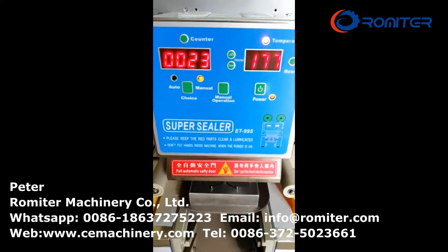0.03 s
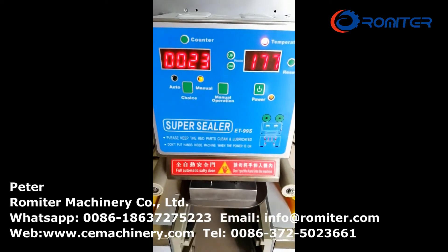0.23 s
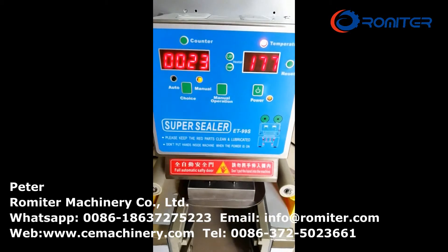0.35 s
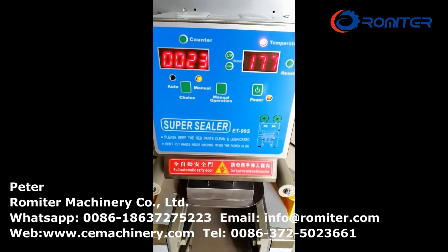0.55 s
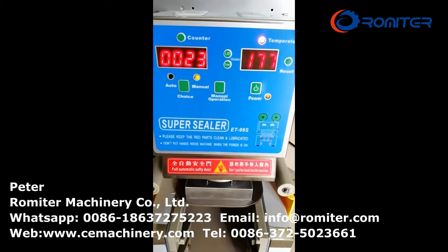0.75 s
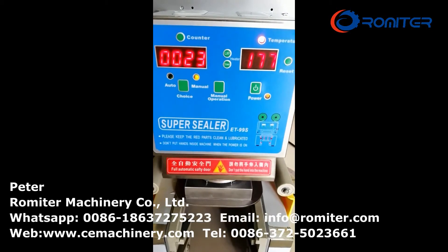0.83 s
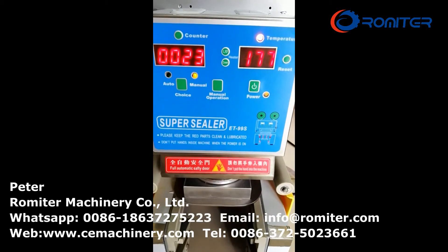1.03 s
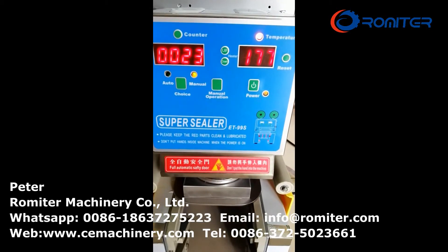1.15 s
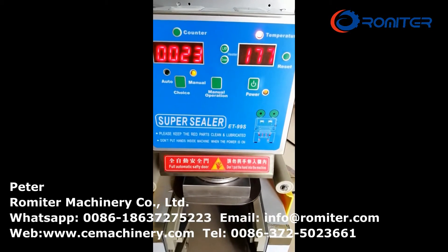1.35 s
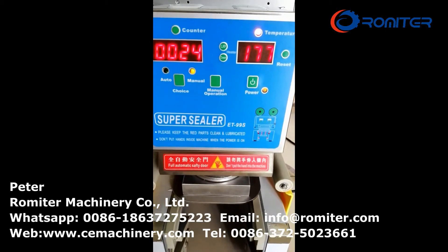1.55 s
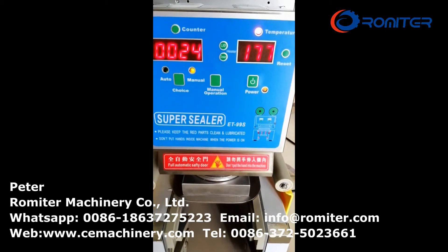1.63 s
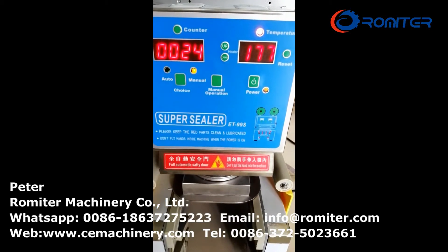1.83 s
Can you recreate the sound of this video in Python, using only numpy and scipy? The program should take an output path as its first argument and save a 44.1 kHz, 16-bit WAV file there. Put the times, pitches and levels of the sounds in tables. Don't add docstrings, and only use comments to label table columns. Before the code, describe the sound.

A small sealing machine cycles close to a phone in a lightly echoing workshop. A thin motor whine stops with bright metal clacks at 0.2 seconds and a solid thud at 0.34. A low press motor hums and grinds, swelling with dull thuds around 0.85-1.1. A latch clicks at 1.37; the motor fades by 1.5, leaving sharp dry clicks, crinkling film and faint hiss until about 1.9.

```python
import sys
import numpy as np
from scipy import signal
from scipy.fft import rfft, irfft
from scipy.io import wavfile
from scipy.ndimage import uniform_filter1d

SR = 44100
rng = np.random.default_rng(int(sys.argv[2]) if len(sys.argv) > 2 else 0)


def attenuation_scalar(level_db):
    decades = np.asarray(level_db, float) / 20
    return 10 ** decades


def bounce(signal):
    frames = np.transpose(np.atleast_2d(signal))
    limited = np.clip(frames, -1, 1)
    pcm = np.round(limited * 32767).astype(np.int16)
    wavfile.write(sys.argv[1], SR, pcm)


N = 83790
T = np.arange(N) / SR


def unit(x):
    return x / np.sqrt(np.mean(x ** 2))


def colour(x, points):
    p = np.array(points)
    f = np.fft.rfftfreq(N, 1 / SR)
    gain_db = np.interp(np.log(f + 1), np.log(p[:, 0]), p[:, 1])
    return irfft(rfft(x) * attenuation_scalar(gain_db), N)


def band(x, hz, width):
    return signal.lfilter(*signal.iirpeak(min(hz, .45 * SR), hz / width, SR), x)


def walk(rate):
    k = int(SR / rate)
    steps = np.repeat(rng.standard_normal(N // k + 1), k)
    smooth = uniform_filter1d(uniform_filter1d(steps, k), k)
    return unit(smooth[:N])


def curve(table, axis=1):
    points = np.array(table)
    return np.interp(T, points[:, 0], points[:, axis])


def grains(share, spread_db):
    size = np.minimum(rng.exponential(size=N), 3)
    return (rng.random(N) < share) * rng.standard_normal(N) * attenuation_scalar(spread_db * size)


def narrow(table, flicker_db):
    total = 0
    for hz, width, db in table:
        level = attenuation_scalar(db + flicker_db * walk(38.05))
        noise = rng.standard_normal(N)
        total = total + level * unit(band(band(noise, hz, width * 1.5), hz, width * 1.5))
    return total


def strike(start, db, hz, rattle, ring_db, modes, octaves):
    t = np.arange(SR // 4) / SR
    push = rng.standard_normal(len(t)) * np.exp(-t / rattle) * np.minimum(t / (0.37 * rattle), 1)
    width = hz * octaves + 90
    for _ in range(3):
        push = band(push, hz, width)
    detune = 1 + 0.0066 * rng.standard_normal((len(modes), 3))
    ring = 0
    for (f, t60), shifts in zip(modes, detune):
        for shift in shifts:
            ring = ring + band(push, f * shift, 4.7 / t60) * np.sqrt(t60)
    y = push / np.abs(push).max() + attenuation_scalar(ring_db) * ring / np.abs(ring).max()
    out = np.zeros(N + len(t))
    i = int(start * SR)
    out[i:i + len(t)] = y * attenuation_scalar(db) / np.abs(y).max()
    return out[:N]


def workshop():
    # (f/Hz, level/dB per Hz)
    room = [(25, 7.5), (40, -6), (70, -6), (235, -14), (620, -37), (1300, -22), (2500, -31), (12000, -26)]
    # (f/Hz, width/Hz, level/dB)
    hiss = [(11500, 3700, -65), (5000, 7300, -69.5)]
    room_db = -64
    shared = rng.standard_normal(N)
    own = [colour(rng.standard_normal(N), [(150, -7), (900, -27), (14000, -6.0)]) for _ in range(2)]
    drift_db = 1.2 * walk(6)
    air = unit(np.array([colour(shared + s, room) for s in own]))
    return attenuation_scalar(room_db + drift_db) * air + np.array([narrow(hiss, 0.51), narrow(hiss, 0.57)])


def reverb(x, t60, db):
    t = np.arange(SR // 2) / SR
    tails = rng.standard_normal((2, len(t))) * np.exp(-np.log(1000) * t / t60) * (t > .003)
    tails /= np.sqrt(np.sum(tails ** 2, axis=1, keepdims=True))
    return attenuation_scalar(db) * np.array([signal.fftconvolve(x, h)[:N] for h in tails])


def film():
    # (t/s, level/dB)
    crinkle_level = [(.95, -62), (1.03, -58.5), (1.35, -64.5), (1.42, -51.5), (1.53, -55), (1.58, -56.5),
                     (1.61, -58.5), (1.64, -51.5), (1.68, -59.5), (1.77, -58.5), (1.79, -69), (1.9, -63.5)]
    # (f/Hz, level/dB per Hz)
    foil = [(3000, -20.5), (5000, -12.5), (6600, -16), (8500, -8), (11500, -5), (13500, -9), (14500, -7.5)]
    crinkle = unit(colour(grains(0.074, 1.3), foil)) * attenuation_scalar(2.35 * walk(58.27))
    fade_in = np.clip((T - .95) / 0.011, 0, 1)
    return crinkle * attenuation_scalar(curve(crinkle_level)) * fade_in


def latches():
    # (t/s, peak level/dB, centre f/Hz, rattle/s)
    clicks = [(.193, -44.5, 2140, 0.042), (0.202, -25, 5160, 0.0028), (0.2003, -32, 9900, 0.0041),
              (.2065, -29, 3670, 0.0015), (.219, -38, 13000, 0.0064), (0.2238, -24, 12200, 0.0018),
              (0.2284, -28, 12000, 0.0014), (.2335, -32, 12100, .002), (.248, -53, 13000, 0.0023),
              (0.2241, -32, 5400, 0.0031), (.2255, -41, 3440, 0.0056), (.236, -47, 3020, 0.031),
              (0.2255, -26.5, 9240, 0.0038), (.239, -57, 4800, 0.0027), (0.421, -48.5, 2550, .012),
              (0.4193, -32.5, 11500, 0.011), (0.42, -42, 6640, 0.0065), (0.468, -44, 7150, 0.012),
              (0.8514, -38, 9500, 0.0062), (0.867, -39, 9000, 0.0026), (.881, -48, 5000, 0.0031),
              (0.8979, -41.5, 7755, 0.0027), (0.955, -48, 6400, 0.016), (1.0093, -48, 11000, 0.01),
              (1.368, -33, 11500, 0.012), (1.371, -47, 2832, 0.018), (1.371, -45.5, 5840, 0.0058),
              (1.55, -26, 12600, 0.002), (1.55, -48, 5200, 0.0022), (1.551, -51.5, 3420, 0.0013),
              (1.542, -40, 11000, 0.00067), (1.616, -40, 9400, .002), (1.6216, -39, 10600, 0.0022),
              (1.6215, -49, 5200, 0.0025), (1.635, -41, 11000, 0.0032), (1.642, -39, 9300, 0.0037),
              (1.642, -55, 4880, 0.0023), (1.6497, -37, 11500, 0.0018), (1.687, -44, 11000, .002),
              (1.704, -47, 12000, 0.0018), (1.7427, -41.5, 12550, 0.0069), (1.818, -46, 10520, 0.0049),
              (1.8248, -44, 10700, 0.0021), (1.877, -60, 4260, 0.01)]
    # (f/Hz, time to fade 60 dB/s)
    plates = [(2100, 0.065), (2891, 0.036), (3500, 0.077), (4700, 0.051), (5270, 0.043), (5884, 0.079),
              (7725, 0.025), (9085, 0.033), (10300, 0.063), (11400, 0.085), (12410, 0.09), (12740, 0.032),
              (14150, 0.45)]
    film_from_s = 1.5
    total = 0
    for click in clicks:
        ring_db = -8 if click[0] < film_from_s else -24
        total = total + strike(*click, ring_db, plates, 0.34)
    return total


def frame_thuds():
    # (t/s, peak level/dB, centre f/Hz, rattle/s)
    thuds = [(.254, -38.5, 1260, 0.0033), (.3402, -35.5, 2350, 0.0033), (.341, -23, 1270, 0.0038),
             (0.42, -41, 1290, 0.0017), (0.357, -31, 1160, 0.0061), (0.46, -41, 2020, 0.0033),
             (.342, -34.5, 940, 0.0046), (0.41, -41, 1110, .008), (.34, -40.5, 337, 0.046),
             (.45, -46.5, 380, 0.068), (.21, -48, 320, 0.018), (0.342, -37, 191, 0.0081),
             (.345, -40.5, 666, 0.01), (.341, -39, 4200, 0.0084), (.405, -34.5, 55, 0.0045),
             (.885, -32, 680, 0.0024), (.84, -49, 396, 0.07), (1, -33, 183, 0.039),
             (0.956, -37.5, 440, 0.019), (.957, -35, 710, 0.011), (1.1, -42.5, 1760, 0.014),
             (0.984, -31.5, 167.6, 0.019), (1.372, -41, 1404, 0.0064), (1.33, -42.5, 237, 0.04),
             (1.04, -40.5, 230, 0.038), (1.549, -52, 1230, 0.00068), (1.876, -56, 1380, 0.012)]
    # (f/Hz, time to fade 60 dB/s)
    body = [(160, 0.15), (210, 0.16), (250, 0.21), (330, 0.03), (409, 0.12), (460, 0.045), (614, 0.028),
            (720, 0.022), (1175, 0.059), (1240, 0.11), (1295, 0.07), (1400, 0.052), (1490, 0.03),
            (2190, 0.03)]
    return sum(strike(*thud, 0.5, body, 0.3) for thud in thuds)


def tray_motor():
    # (f/Hz, width/Hz, level/dB)
    whine = [(2043, 91, -63), (3390, 1160, -57), (4650, 120, -54.5), (9360, 680, -55)]
    # (f/Hz, width/Hz, level/dB)
    tray_hum = [(57.5, 8, -64), (233, 13, -72), (305, 24, -71), (463, 69, -68)]
    stop_s, coast_s, whine_end_s = .2, .015, .335
    coast_db = -5.5
    run = np.exp(-np.maximum(T - stop_s, 0) / coast_s)
    linger = np.clip((whine_end_s - T) / .015, 0, 1) * attenuation_scalar(coast_db * (1 - run))
    mains = attenuation_scalar(-50) * np.sin(2 * np.pi * 100.5 * T)
    flutter_db = 3 * walk(90)
    pitch_hz = 4716 + 60 * walk(90)
    tone = attenuation_scalar(-53.5 + flutter_db) * np.sin(2 * np.pi * np.cumsum(pitch_hz) / SR)
    return (tone + narrow(whine, 2.5)) * linger + (mains + narrow(tray_hum, 0.34)) * run


def press_motor():
    # (t/s, f/Hz, level/dB)
    hum_path = [(.2, 232, -52), (.274, 230, -50), (.31, 228.4, -44), (.332, 221, -69), (.358, 215, -42),
                (.376, 210.1, -36.5), (.402, 209, -49), (.416, 215, -41.5), (.444, 200, -60),
                (.46, 198.2, -43.5), (.62, 199.9, -45), (.88, 199.6, -45), (.93, 200.7, -42),
                (1.04, 200.3, -50), (1.09, 201.6, -36.5), (1.2, 201, -39), (1.43, 200.7, -42.5),
                (1.5, 199, -62)]
    # (t/s, f/Hz, level/dB)
    shaft_path = [(.44, 140, -60), (.5, 135.3, -59.5), (.84, 135, -60), (.9, 160.8, -55),
                  (1.03, 160.7, -47.5), (1.1, 153, -50.5), (1.25, 154.5, -53), (1.33, 151.8, -57),
                  (1.42, 162.3, -70), (1.5, 160.2, -67.5), (1.9, 158, -78.5)]
    # (t/s, level/dB)
    gears = [(0, -65), (.2, -65.5), (.26, -54), (.33, -60.5), (.36, -54.5), (.55, -58), (.62, -63.5),
             (.84, -59), (.9, -54), (1.0, -51), (1.1, -55), (1.42, -56), (1.5, -76), (1.6, -79.5),
             (1.9, -78.5)]
    # (f/Hz, width/Hz, level/dB)
    gearbox = [(622.4, 29, -4), (755, 37, -1), (1217, 54, -4), (1291, 39, -5.5), (1795, 147, -8.5),
               (2456, 81, -11), (3020, 140, -14), (5200, 420, -10)]
    # (f/Hz, level/dB per Hz)
    gear_bed = [(45, -35), (200, 4.5), (380, -14), (750, -8.5), (1000, -7), (1250, -12), (2800, -13.5),
                (13000, -28.5)]
    # (f/Hz, width/Hz, level/dB)
    frame = [(57, 17, -64.5), (103, 8.6, -59), (243, 29, -59.5), (83, 7.6, -65)]

    hum_level = np.sqrt(2) * attenuation_scalar(curve(hum_path, axis=2) + 1.2 * walk(45))
    hum = hum_level * np.sin(2 * np.pi * np.cumsum(curve(hum_path)) / SR)
    hum = hum * (T > .2) * (T < 1.6)

    shaft_level = np.sqrt(2) * attenuation_scalar(curve(shaft_path, axis=2) + 3.5 * walk(29.6))
    shaft_hz = curve(shaft_path) + 2.87 * walk(24.76)
    shaft = shaft_level * np.sin(2 * np.pi * np.cumsum(shaft_hz) / SR)

    teeth = grains(0.11, 8.1)
    box = 0
    for hz, width, db in gearbox:
        ringing = unit(band(band(teeth, hz, 2.18 * width), hz, 3 * width))
        box = box + attenuation_scalar(db) * ringing * attenuation_scalar(2.75 * walk(14.1))
    bed = colour(rng.standard_normal(N), gear_bed) * attenuation_scalar(1.0 * walk(40))
    effort_db = curve(gears)
    grinding = attenuation_scalar(effort_db) * (attenuation_scalar(2.5) * unit(box) + attenuation_scalar(3.5) * unit(bed))

    frame_db = 0.61 * (effort_db + 53.0) - 3 * (T - 0.8251)
    return hum + shaft + grinding + attenuation_scalar(frame_db) * narrow(frame, 2.2)


def scene():
    # (f/Hz, level/dB)
    shade = [(60, 0), (300, -4.5), (600, 0.5), (1250, -2.5), (3000, -14), (8000, -7.5), (12000, -9),
             (14000, -5)]
    # (f/Hz, width/Hz, level/dB)
    port = [(13200, 250, 3), (14200, 200, 7)]
    lag = 26
    near = attenuation_scalar(6.0) * latches() + attenuation_scalar(1.5) * frame_thuds() + attenuation_scalar(6.5) * film()
    near = near + tray_motor() + press_motor()
    to_room = colour(near, [(60, -10.0), (200, -7.5), (500, -1.5), (5000, -0.5), (14000, 0.5)])
    wet = reverb(to_room, 0.28, -4.5)
    air = workshop()

    left = near + wet[0] + air[0]
    left = left + sum(attenuation_scalar(db) * band(left, hz, width) for hz, width, db in port)

    bass = colour(near, [(300, 4.5), (600, -7.5)])
    late_top = np.roll(near - bass, lag)
    right = colour(bass + late_top, shade) + colour(wet[1], [(500, 1.5), (14000, -8.5)])
    return np.array([left, right + attenuation_scalar(-5.0) * air[1]])


def top_cut(x):
    return signal.sosfilt(signal.butter(12, 14830, fs=SR, output="sos"), x)


def record(dry):
    top_hz = 14380
    low_pass = signal.ellip(10, .2, 75, top_hz, fs=SR, output="sos")
    mix = signal.sosfilt(low_pass, dry)
    return top_cut(mix)


dry = scene()
out = record(dry)
bounce(out)
```